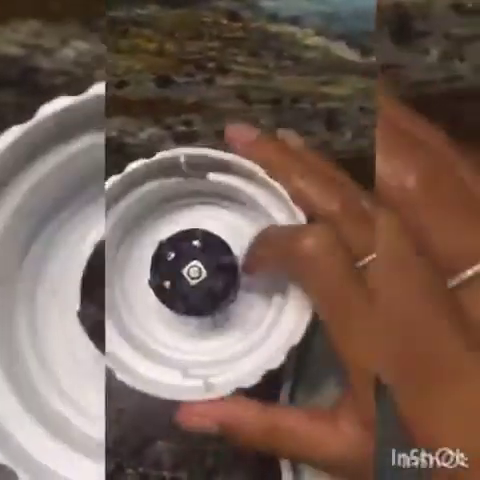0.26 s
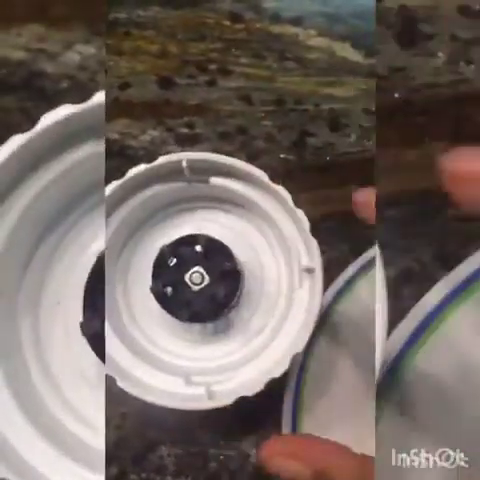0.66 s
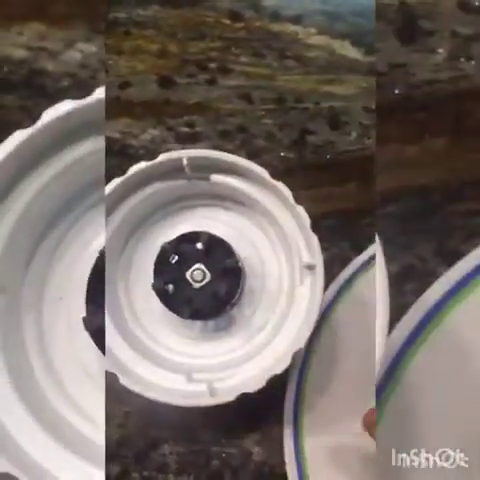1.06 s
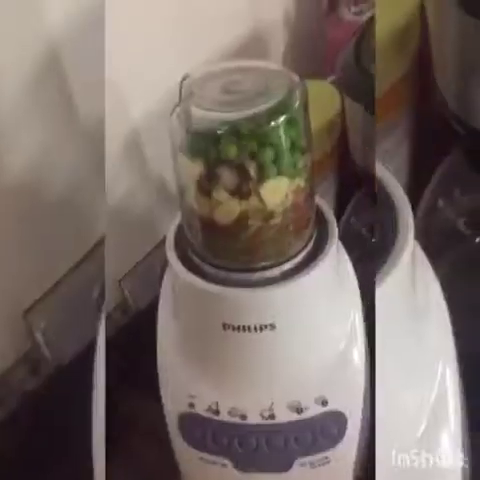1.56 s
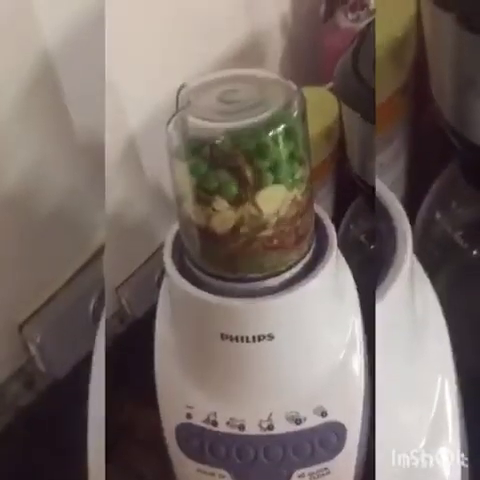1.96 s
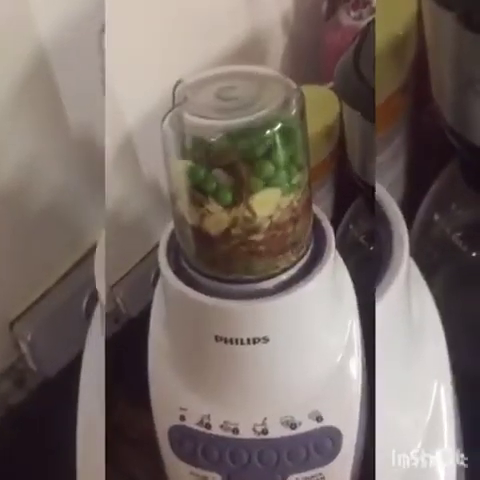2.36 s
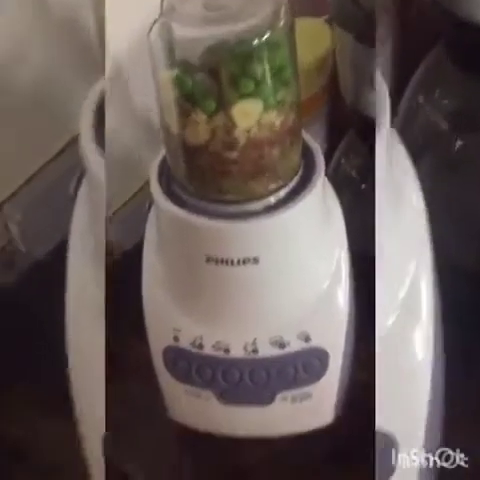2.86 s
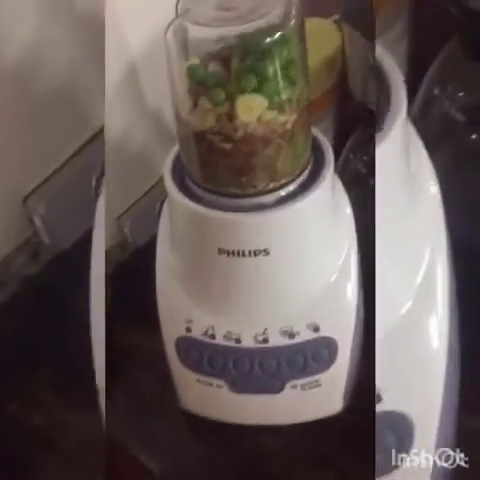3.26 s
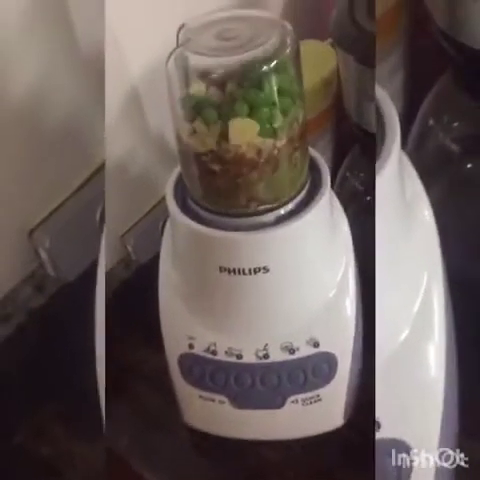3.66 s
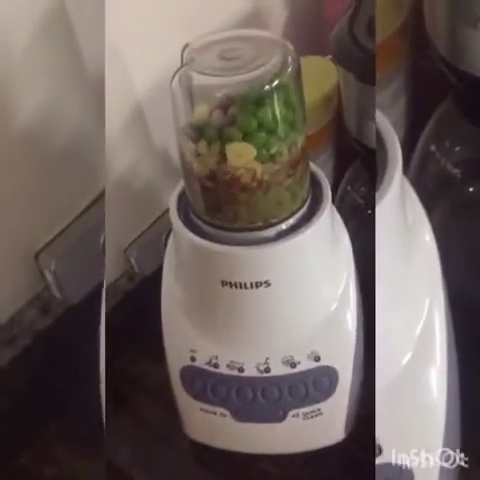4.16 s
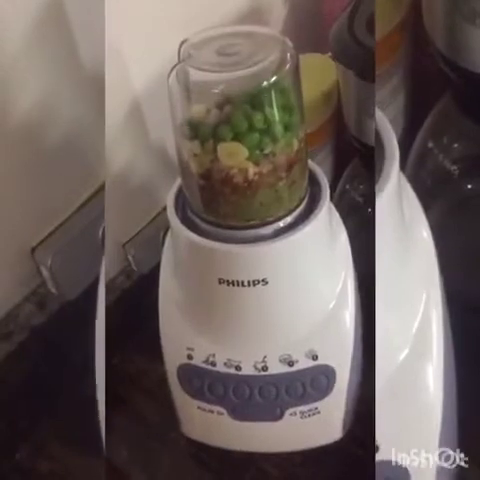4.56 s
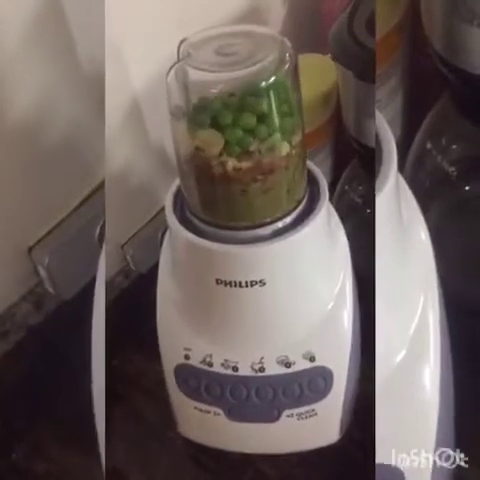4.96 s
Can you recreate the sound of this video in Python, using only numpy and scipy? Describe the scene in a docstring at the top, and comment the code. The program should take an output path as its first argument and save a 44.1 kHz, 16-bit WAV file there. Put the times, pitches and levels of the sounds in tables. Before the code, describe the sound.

Plastic blade cap knocks down once in a kitchen; a second later a little blender whines and roars, sagging with each lump chopped.

```python
"""Blender on a stone counter

A plastic blade cap knocks down in a few quick contacts: noise snaps, ringing modes and a diffuse room tail.
Then a small blender starts abruptly. Its motor whines near 200 turns a second, as sines locked to the shaft,
and about three times a second a lump of vegetable falls into the blades, is chopped with a roar of
blade-pass noise and drags the speed down. Quiet kitchen air and hum lie underneath."""
import sys
import numpy as np
from scipy import signal
from scipy.fft import rfft, irfft
from scipy.io import wavfile

SR = 44100
rng = np.random.default_rng(int(sys.argv[2]) if len(sys.argv) > 2 else 0)


def generate_wav(sig):
    """Save sig (samples, or channels by samples) to the path in sys.argv[1] as 16-bit PCM at SR."""
    pcm = np.round(np.clip(np.atleast_2d(sig).T, -1, 1) * 32767).astype(np.int16)
    wavfile.write(sys.argv[1], SR, pcm)


N = 229981
TIME = np.arange(N) / SR
START_S = 1.394  # the motor starts
CRUISE_HZ = 200  # shaft speed at which the speed-dependent levels hold


def amp(db):
    """Decibels to gain."""
    return 10 ** (np.asarray(db) / 20)


def unit(x):
    """Scales to rms 1."""
    return x / np.sqrt(np.mean(x ** 2) + 1e-20)


def noise():
    """White noise over the whole scene."""
    return rng.standard_normal(N)


def read(points, hz):
    """Reads a table of values against frequency on a log-frequency axis."""
    f, value = np.transpose(points)
    return np.interp(np.log(hz + 1), np.log(f + 1), value)


def colour(x, points):
    """Causal minimum-phase filter with the given spectrum."""
    level_db = np.maximum(read(points, abs(np.fft.fftfreq(4096, 1 / SR))), -100)
    log_gain = np.log(amp(level_db))
    taps = np.fft.ifft(np.exp(np.conj(signal.hilbert(log_gain)))).real
    return signal.oaconvolve(x, taps[:len(taps) // 2])[:N]


def drift(hz):
    """Slow random wander of rms 1, up to about hz."""
    f = np.fft.rfftfreq(N, 1 / SR)
    return unit(irfft(rfft(noise()) / (1 + (f / hz) ** 4), N))


def decay(age, t60):
    """Exponential fall by 60 dB in t60 seconds."""
    return np.exp(-np.log(1000) * age / t60)


def leak(x, seconds):
    """Running sum that forgets exponentially, as a pressure or a speed loss does."""
    return signal.lfilter([1], [1, -np.exp(-1 / (seconds * SR))], x)


def blender(rise_s=0.017):
    """All the parts follow one shaft, which stumbles more under load."""
    speed = shaft_speed()
    load = loads(speed)
    stumble = .002 * unit(load[0]) * drift(40)
    turns = np.cumsum(speed * (1 + stumble)) / SR
    running = np.clip((TIME - START_S) / rise_s, 0, 1)
    motor = whine(turns, speed) + coupling(turns, speed)
    contents = pulp(turns, speed) + chopping(turns, load) + cracks()
    return running * (motor + contents)


def bite(start_s, length_s, bite_s=.022, clear_s=.02):
    """How firmly the blades are in one lump, 0-1: they bite in, hold, then clear its remains."""
    age = TIME - start_s
    return np.clip(age / bite_s, 0, 1) * np.exp(-np.maximum(age - length_s, 0) / clear_s)


# Lumps that fall into the blades; levels are relative, the cost is the speed taken off before recovery:
# start_s, length_s, level_db, jar_ring_db, thud_db, speed_cost_hz (turns per second)
LUMPS = [(1.392, 0.13, -23.5, 5.5, -11, 9.8), (1.575, .32, -23, 5.5, -3.5, 9.9),
         (2.033, 0.067, -21.5, 8.5, 4, 1.97), (2.135, .025, -22, 9, 3, 10.15),
         (2.386, .09, -21.5, 7.5, -2.5, 14.3), (2.633, .13, -20, 7, -1, 26.8), (2.762, .1, -26, 7, -5, 8.2),
         (2.94, .088, -21, 6.5, 1.5, 24.3), (3.3, .075, -17.5, 3, 1, 33.5),
         (3.7, .055, -18.5, 6, -1.5, 24.9), (4.072, .066, -18, 3, -1, 21.1),
         (4.33, .09, -21, 5.5, -5, 18.4), (4.864, .045, -16.5, 1, 0.5, 25.2)]


def shaft_speed(start_hz=152, free_hz=209.8, run_up_s=.774, recover_s=.222):
    """The motor speeds up as the contents thin out; each lump brakes it and it recovers."""
    free = free_hz - (free_hz - start_hz) * np.exp(-np.maximum(TIME - START_S, 0) / run_up_s)
    braking = np.zeros(N)
    for s, length, _, _, _, cost in LUMPS:
        grip = bite(s, length)
        braking += cost * grip / grip.sum()
    return free - leak(braking, recover_s)


def loads(speed, bits_db=-27.5, bits_ring_db=1, bits_thud_db=-14.5, db_per_hz=0.04, snatch_db=1.2):
    """Strength of the crunch, the jar's ring and the thud: small bits all the time, and the lumps on top."""
    bits = amp([[0], [bits_ring_db], [bits_thud_db]])
    power = (bits * amp(bits_db + db_per_hz * (speed - CRUISE_HZ))) ** 2
    snatch = amp(snatch_db * drift(25))  # the blades catch a lump unevenly
    for s, length, db, ring_db, thud_db, _ in LUMPS:
        lump = amp(db) * amp([[0], [ring_db], [thud_db]])
        power += (lump * snatch * bite(s, length)) ** 2
    return np.sqrt(power)


def clearness(speed, db_per_hz=.45, lowest_db=-17, highest_db=.5, choke_db=7, choke_s=.04):
    """How far the whine stands out (dB): more with speed, less, after a lag, while a lump chokes it."""
    grip = np.minimum(sum(bite(s, length) for s, length, *_ in LUMPS), 1)
    keep = np.exp(-1 / (choke_s * SR))
    choke = signal.lfilter([1 - keep], [1, -keep], grip)
    return np.clip(db_per_hz * (speed - CRUISE_HZ), lowest_db, highest_db) - choke_db * choke


# Body of the whine; the loose coupling repeats every four turns, hence the quarters:
# shaft_multiple, relative level_db
ORDERS = [(0.75, -12.5), (1.0, -7.5), (1.25, -5.0), (1.5, -8.5), (1.75, -15.0), (2.0, -3.0), (2.5, -8.0),
          (2.75, -11.0), (3.0, -1.5), (3.5, -8.0), (4.0, -9.0), (4.25, -10.0), (4.75, -5.0), (5.0, -10.0),
          (5.5, -10.0), (5.75, -12.0), (6.0, -4.0), (6.5, -14.0), (6.75, -15.0), (7.0, -3.0), (7.75, -12.0),
          (8.0, -10.0), (8.75, -11.0), (9.0, -7.0), (9.5, -12.0), (9.75, -10.0), (10.0, -6.0),
          (10.25, -13.0), (10.5, -13.0), (11.0, -14.0)]
# Thin top of the whine: shaft_multiple, relative level_db
TOP_ORDERS = [(12, -12), (12.25, -14), (12.5, -13), (12.75, -16), (17, -12), (18, -11), (19, -12),
              (23, -13)]
# Motor housing resonances; an order sings out as it climbs through one: centre_hz, width_hz, lift_db
HOUSING = [(150, 16, 7), (295, 40, 2), (385, 50, 4), (580, 130, 6), (700, 60, 4), (850, 80, 5),
           (965, 70, 6), (1190, 110, 7), (1420, 70, 7), (1630, 60, 5), (1790, 140, 3), (2025, 80, 6),
           (2480, 250, 6)]


def whine(turns, speed, level_db=-26.3, tilt_db=-1, waver_db=1.2, drone_db=-24, mains_db=-45):
    """Shaft orders, each wavering; the low ones hum through the base and hardly feel the contents."""
    clear_db = clearness(speed)
    lines = np.zeros(N)
    for k, db in list(ORDERS) + list(TOP_ORDERS):
        share = np.clip((k - 1) / 2, .15, .85)  # how much this order feels the contents
        lift_db = sum(lift / (1 + (2 * (k * speed - hz) / width) ** 2) for hz, width, lift in HOUSING)
        order_db = db + tilt_db * np.log2(k)  # tilt is per octave above the shaft speed
        order_db = order_db + lift_db + share * clear_db + waver_db * drift(7.6)
        lines += amp(order_db) * np.sin(2 * np.pi * (k * turns + rng.random()))
    # the base drones while the shaft runs up through its resonance
    base_hz, base_width_hz = 151, 24
    base_gain = amp(drone_db) / (1 + (2 * (speed - base_hz) / base_width_hz) ** 2)
    drone = base_gain * unit(np.sin(2 * np.pi * turns))
    mains = unit(np.sin(2 * np.pi * 100 * TIME) + .4 * np.sin(2 * np.pi * 50 * TIME))
    return amp(level_db) * lines + drone + amp(mains_db) * mains


def coupling(turns, speed, rasp_db=-28, size=600):
    """The worn drive teeth rasp against the jar the same way every four turns."""
    teeth = np.linspace(0, 4, size, endpoint=False)
    rasp = np.interp(turns, teeth, rng.standard_normal(size), period=4)
    return amp(clearness(speed) + rasp_db) * unit(jar_ring(rasp))


def strikes(turns, sizes):
    """One click at every whole number of turns, sized by the signal sizes."""
    whole = np.floor(turns)
    return np.diff(whole, prepend=whole[0]) * sizes


# Crunch of chopped vegetable: frequency_hz, relative level_db (per Hz)
CHOP_COLOUR = [(35, -42), (60, -37), (174, -7.5), (253, -6.5), (370, -9.5), (441, -7), (959, -1.5),
               (1340, -5), (1630, -4.5), (1990, -3), (2540, -11.5), (4520, -8.5), (5280, -13), (9200, -24),
               (12000, -52), (15600, -29), (22000, -120)]
# Thud through the base: frequency_hz, relative level_db (per Hz)
THUD_COLOUR = [(30, -55), (75, -2.5), (130, 0), (190, 8.5), (260, 1), (360, 9), (450, -5.5), (800, -27.5)]


def chopping(turns, load, chop_db=3.5, ring_db=-3, thud_db=-4, uneven_db=2, clump_db=-0.67,
             crush_s=0.00099, smear=0.57, rattle_db=2):
    """Each blade pass crushes a piece: a short crunch that rings the jar and thuds through the base."""
    sizes = amp(uneven_db * np.clip(noise(), -2, 2))
    passes = strikes(2 * turns + 0.14 * drift(200), sizes)  # two passes a turn, with jitter
    pressure = unit(leak(passes, crush_s)) + smear
    crunch = pressure * noise() * amp(clump_db * drift(36))
    chop = amp(chop_db) * unit(colour(crunch, CHOP_COLOUR))
    ring = amp(ring_db + rattle_db * drift(33)) * unit(jar_ring(pressure * noise()))
    thud = amp(thud_db) * unit(colour(pressure * noise(), THUD_COLOUR))
    return (load * np.array([chop, ring, thud])).sum(axis=0)


# Hard pieces that crack against the jar: start_s, relative level_db, decay_s
CRACKS = [(1.404, -18, 0.043), (1.466, -20, 0.02), (1.64, -17, 0.013), (1.691, -8.5, 0.007),
          (1.85, -23, 0.0059), (2.113, -29, 0.0074), (2.153, -10.5, 0.0089), (2.322, -15.5, 0.018),
          (2.706, -28, 0.011), (2.972, -14, .015), (3.348, -10, 0.016), (3.564, -15, 0.0071),
          (3.751, -18, .014), (4.107, -18, 0.015), (4.417, -14, .008), (4.875, -10.5, 0.016),
          (4.887, -20, 0.018)]
# Bright snap of hard plastic, shared with the cap: frequency_hz, relative level_db (per Hz)
SNAP_COLOUR = [(60, -34.5), (150, -18), (300, 1), (1000, 13.5), (3000, 6), (5500, 6), (7500, -1),
               (11500, -10)]


def cracks(ring_db=-2, snap_db=-6):
    """A hard piece rattles between blade and wall for a moment."""
    rattle = np.zeros(N)
    for s, db, length in CRACKS:
        rattle += amp(db) * (TIME >= s) * np.exp(-np.maximum(TIME - s, 0) / length)
    wall = amp(ring_db) * unit(jar_ring(noise()))
    edge = amp(snap_db) * unit(colour(noise(), SNAP_COLOUR))
    return rattle * (wall + edge)


# Wet rush of the pulp: frequency_hz, relative level_db (per Hz)
PULP_COLOUR = [(40, -26), (100, -12), (200, -17), (330, 1), (440, -12), (600, 4.5), (950, 1.5),
               (1300, -11.5), (1600, -4.5), (2050, -3.5), (2800, -18), (3700, -7.5), (7000, -13),
               (10500, -16.5), (12000, -21)]


def pulp(turns, speed, rush_db=-28, ring_db=-29, swirl=0.24, slosh_db=0.2, db_per_hz=0.17):
    """Wet pulp and cooling air rush round with the blades, louder with speed, and keep the jar ringing."""
    stir = amp(slosh_db * drift(38) + db_per_hz * (speed - CRUISE_HZ))
    stir = stir * (1 + swirl * np.cos(2 * np.pi * turns))
    rush = amp(rush_db) * unit(colour(noise() * stir, PULP_COLOUR))
    return rush + amp(ring_db) * unit(jar_ring(noise() * stir))


# Resonances of the plastic jar: centre_hz, width_hz, relative level_db
JAR = [(932, 86, 5), (1242, 14, 5.5), (1418, 23, -3.5), (1835, 80, 10), (2001, 79, 14), (2400, 20, -6),
       (2650, 35, -26), (3460, 73, 2), (3672, 48, 4.5), (4000, 37, 1), (4550, 12, 1), (5730, 110, -15.5),
       (6030, 120, -6.5), (6530, 67, -42), (8800, 67, -46), (10200, 100, -45)]


def jar_ring(x):
    """The jar's resonances ring as damped cosines, the wider ones dying sooner."""
    t = np.arange(SR // 10) / SR
    ring = np.zeros(len(t))
    for hz, width, db in JAR:
        ring += amp(db) * width * np.exp(-np.pi * width * t) * np.cos(2 * np.pi * hz * t)
    return signal.oaconvolve(x, ring)[:N]


# Contacts of the cap with the counter: start_s, relative level_db, ring_db (on top of the level), decay_s
KNOCKS = [(0.221, -49, 5.5, 0.022), (0.2373, -38, -3.5, 0.019), (0.248, -21, -4.5, 0.0065),
          (0.2622, -15.5, -19, 0.0041), (0.264, -4.5, 3, 0.0018), (0.27, -19, 11, 0.002)]
# Modes of the cap: frequency_hz, relative level_db, t60_s
CAP_MODES = [(305, -14, 0.052), (381, 3.5, 0.057), (594, -15, 0.1), (690, -2.5, 0.1), (800, -5, 0.13),
             (1045, -3.5, 0.033), (1260, -4.5, .05), (1720, -3, 0.052), (1960, -16, 0.038),
             (2700, 1.5, 0.031)]


def cap(ring_db=-12, snap_db=-2, room_db=-16, lowest_hz=230):
    """The rim touches down in a few quick contacts; each snaps, rings the cap and fills the room."""
    snap, ring, tail = np.zeros((3, N))
    for s, db, body_db, length in KNOCKS:
        age = np.maximum(TIME - s, 0)
        snap += amp(db) * noise() * (TIME >= s) * np.exp(-age / length)
        for hz, mode_db, t60 in CAP_MODES:
            ring += amp(db + body_db + mode_db) * np.sin(2 * np.pi * hz * age) * decay(age, t60)
        tail += amp(db) * room(s)
    # too small to radiate bass
    ring = signal.sosfilt(signal.butter(2, lowest_hz, "high", fs=SR, output="sos"), ring)
    return amp(snap_db) * colour(snap, SNAP_COLOUR) + amp(ring_db) * ring + amp(room_db) * tail


# Decay time of the kitchen: frequency_hz, t60_s
ROOM_T60 = [(200, 0.49), (700, 0.61), (1400, 0.63), (3000, 0.6), (5000, 0.61), (10000, 0.376)]
# Tone of the kitchen's tail: frequency_hz, relative level_db
ROOM_COLOUR = [(60, -36), (200, -8.5), (370, 1), (520, -10.5), (690, 4.5), (900, -7.5), (1030, 1.5),
               (1150, -11), (1700, -13), (2200, -19.5), (2750, -12.5), (3500, -24), (5200, -22),
               (11000, -36)]


def room(start_s, build_s=0.0089):
    """The tiled kitchen answers a knock with a diffuse noise tail whose top treble dies first."""
    hz, t, bands = signal.stft(unit(colour(noise(), ROOM_COLOUR)), SR, nperseg=256)
    bands = bands * decay(np.maximum(t - start_s, 0), read(ROOM_T60, hz)[:, None])
    tail = signal.istft(bands, SR, nperseg=256)[1][:N]
    return tail * np.clip((TIME - start_s) / build_s, 0, 1)


def switch(centre_s=1.3345, tick_hz=1430, tick_db=-35, tick_s=0.001, thump_hz=190, thump_db=-52, thump_s=.006):
    """The button gives a small dull tick and nudges the base just before the motor starts."""
    age = TIME - centre_s
    tick = amp(tick_db) * np.sin(2 * np.pi * tick_hz * age) * np.exp(-(age / tick_s) ** 2)
    thump = amp(thump_db) * np.sin(2 * np.pi * thump_hz * age) * np.exp(-(age / thump_s) ** 2)
    return tick + thump


# Quiet air of the kitchen: frequency_hz, relative level_db (per Hz)
AIR_COLOUR = [(18, -33.5), (30, -13.5), (59, -7), (108, -15.5), (178, -6), (197, -9), (461, -21),
              (2670, -32), (2870, -31), (3100, -30), (12000, -43), (15600, -71.5), (22000, -120)]
# Faint wavering tones of the kitchen: frequency_hz, level_db (rms)
HUM = [(172, -74), (630, -78.5), (1023, -82), (2859, -82.5)]
# Dying ring of earlier handling: frequency_hz, relative level_db (per Hz)
FADING_COLOUR = [(47, -75.5), (80, -52.5), (248, -10), (394, -18.5), (517, -7.5), (562, -21.5), (599, 1.5),
                 (665, -14.5), (786, -2), (970, -14), (1080, -12.5), (4670, -34.5), (12000, -61),
                 (15600, -101), (22000, -120)]


def kitchen(air_db=-63.5, fading_db=-34, fading_t60_s=.8, waver_db=2):
    """Quiet coloured-noise air and hum, with the dying ring of earlier handling."""
    air = amp(air_db) * unit(colour(noise(), AIR_COLOUR))
    hum = np.zeros(N)
    for hz, db in HUM:
        hum += amp(db + waver_db * drift(12)) * np.sqrt(2) * np.sin(2 * np.pi * hz * TIME)
    fading = amp(fading_db) * unit(colour(noise(), FADING_COLOUR)) * decay(TIME, fading_t60_s)
    return air + hum + fading


def scene():
    """Everything reaches one microphone, heard alike on both channels."""
    mono = blender() + cap() + switch() + kitchen()
    return np.array([mono, mono])


def record(dry, edge_hz=11950):
    """The loudest peaks are rounded off; then a steep low-pass limits the band."""
    rounded = dry / (1 + dry ** 6) ** (1 / 6)
    low_pass = signal.firwin(401, edge_hz, window=("kaiser", 9), fs=SR)
    return signal.oaconvolve(rounded, low_pass[None], "same")


dry = scene()
out = record(dry)
generate_wav(out)
```